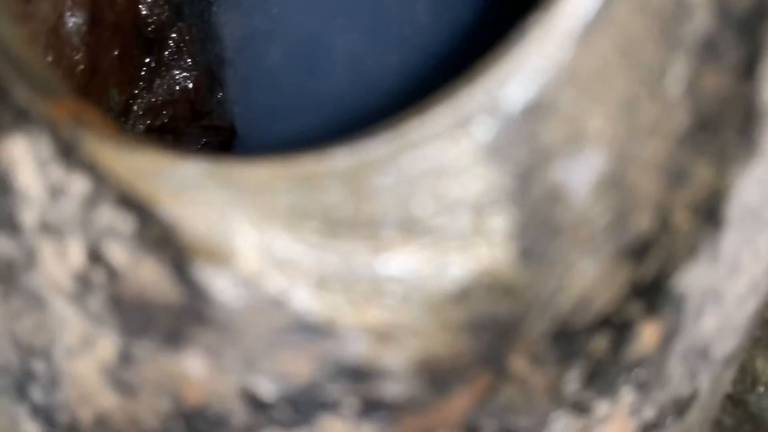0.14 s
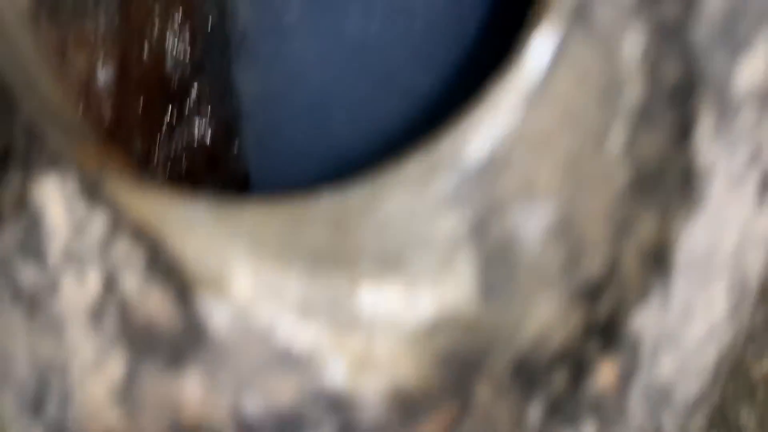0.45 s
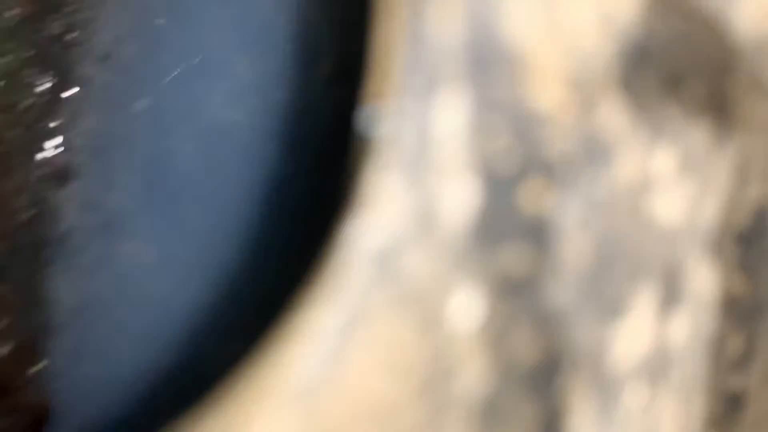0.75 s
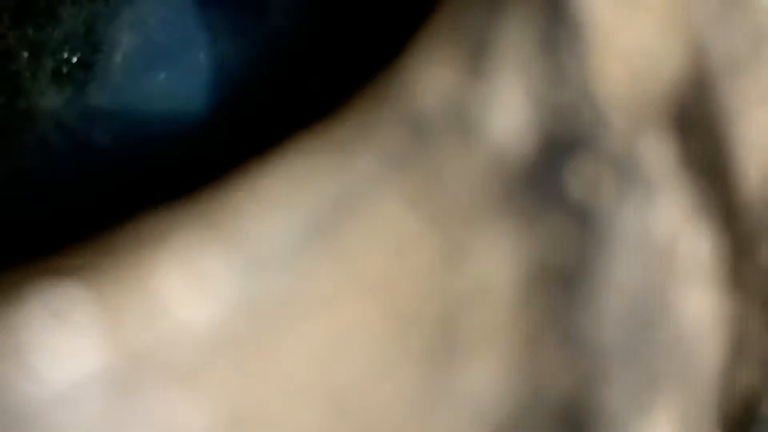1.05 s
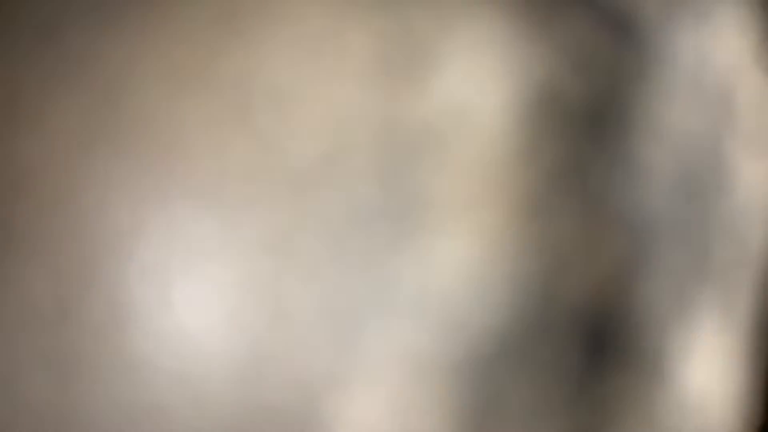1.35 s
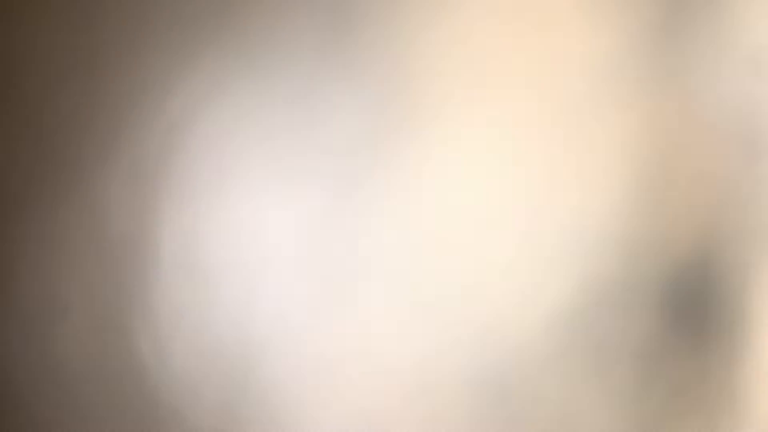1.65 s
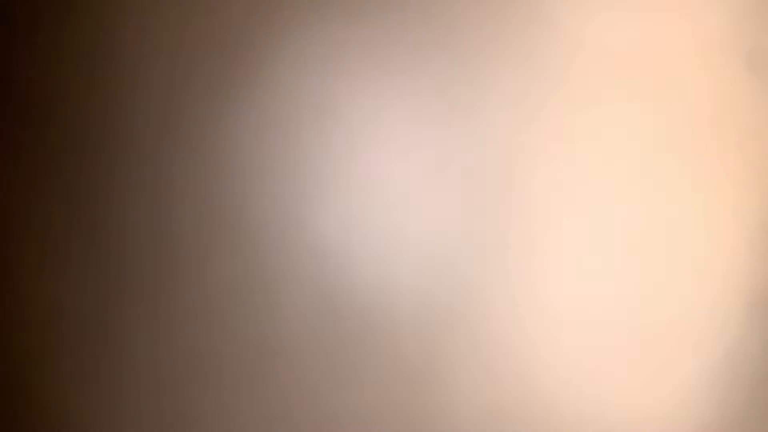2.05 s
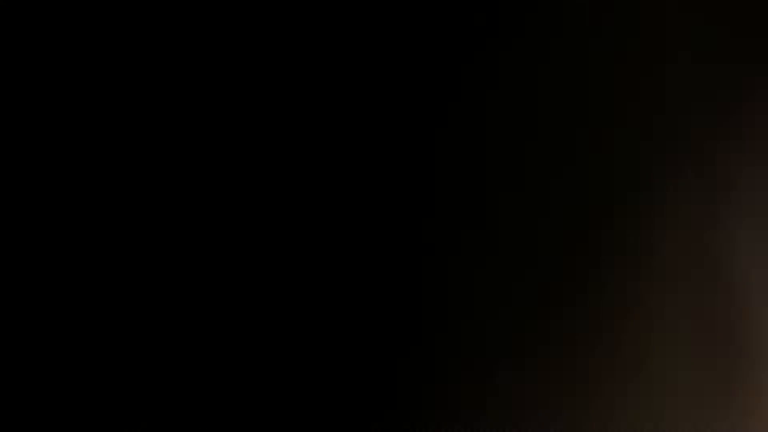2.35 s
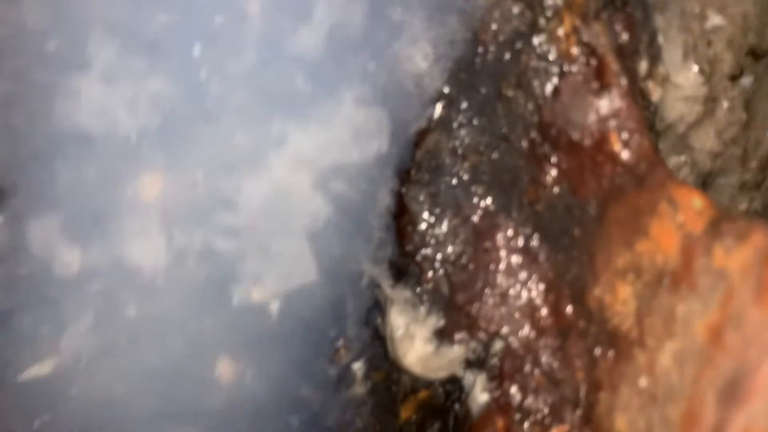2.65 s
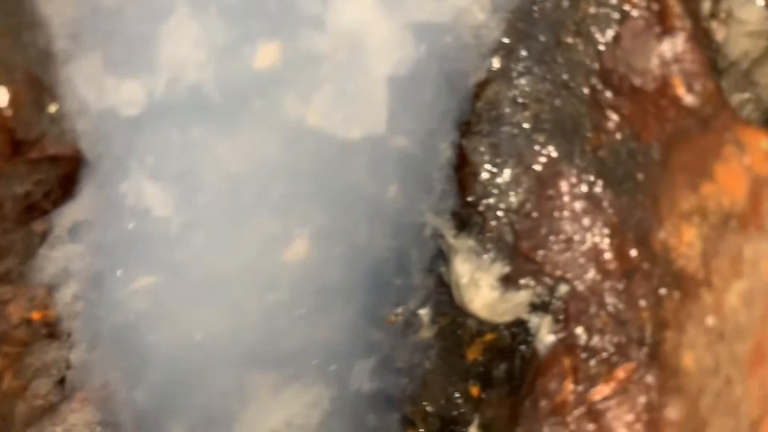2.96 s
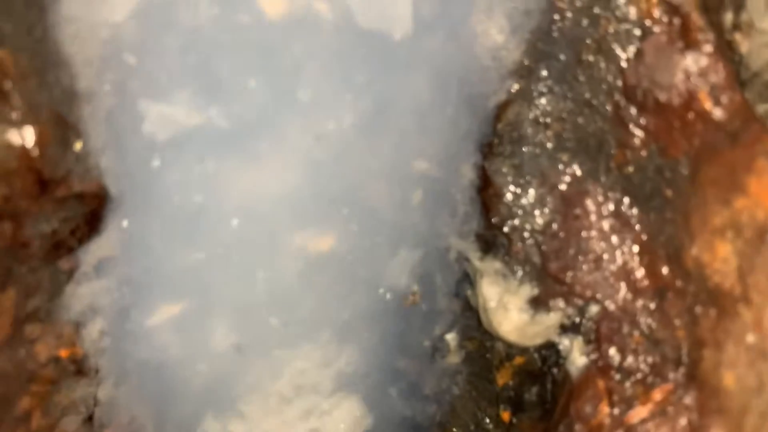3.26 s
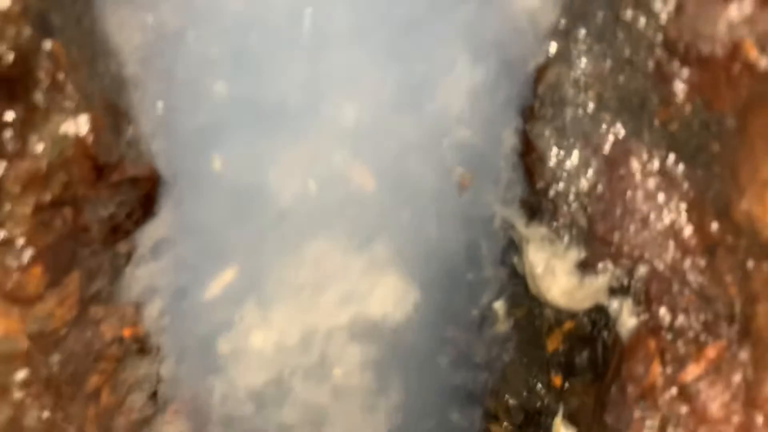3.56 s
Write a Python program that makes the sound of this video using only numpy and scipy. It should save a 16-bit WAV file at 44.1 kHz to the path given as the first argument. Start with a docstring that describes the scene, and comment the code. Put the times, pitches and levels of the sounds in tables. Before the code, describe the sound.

Hollow iron knocks and a short rusty scrape as a camera bumps inside a drain pipe

```python
"""A low rush, filtered noise, runs throughout; from about 0.3 s grainy rubs of a camera housing on a
cast-iron drain pipe join it. A noise-band squeak swells, then falls off as the camera lands on the rim at 0.87 s:
knocks (filtered impulses and rattles) and a damped 50 Hz thud; the contacts lose bass, then regain it.
More knocks and rubs follow, the main ring rising; a stick-slip scrape along rust (random impulses) spans
2.15-2.42 s. Knocks and grind reach the microphones through the case, treble first and bass last."""
import sys
import numpy as np
from scipy import signal
from scipy.fft import rfft, irfft, next_fast_len
from scipy.io import wavfile
from scipy.ndimage import uniform_filter1d, map_coordinates

SR = 44100
rng = np.random.default_rng(int(sys.argv[2]) if len(sys.argv) > 2 else 0)


def int16_out(signal):
    """Quantize to a 16-bit WAV file."""
    q = np.round(np.clip(np.atleast_2d(signal).T, -1, 1) * 32767)
    wavfile.write(sys.argv[1], SR, q.astype(np.int16))


N = 163170

# Knocks of housing on pipe (time [s], thump [dB], knock [dB], clack [dB], tick [dB]), before voice gains
KNOCK_EVENTS = [(0.868, -13, -17.5, 3.5, -17), (0.872, -9, -12, -41.5, -18.5),
                (0.885, -18, -20.5, -43.5, -45.5), (0.963, -17.5, -28.5, -42.5, -48),
                (1.007, -20.5, -27.5, -48, -53.5), (1.066, -16, -24, -37, -42),
                (1.077, -50, -26, -9, -35.5), (1.083, -9, -12.5, -18, -30), (1.245, -24.5, -31, -22.5, -47),
                (1.475, -28.5, -36, -32, -45.5), (1.602, -6, -9, -19, -58.5),
                (1.612, -3.5, -5.5, -28, -42.5), (1.619, -23, -1, -50.5, -51.5),
                (1.638, -10.5, -6, -28, -38.5), (1.728, -28, -26, -24.5, -35.5),
                (1.876, -6.5, -14.5, -26, -52), (1.973, -30.5, -30, -16, -38),
                (2.026, -10, -5.5, -9.5, -35), (2.036, -3.5, -7, -31, -55.5),
                (2.156, -31.5, -20.5, -20, -29), (2.203, -14.5, -25, -19.5, -35.5),
                (2.239, -25.5, -7.5, -22, -28.5), (2.257, -23, -10, -41, -31.5),
                (2.268, -9, -7.5, -31, -32), (2.311, -51, -11, -17, -23.5), (2.355, -22, -4.5, -27, -21),
                (2.365, -25, -11.5, -21.5, -31), (2.395, -58, -15.5, -15.5, -23),
                (2.409, -20.5, -12.5, -17.5, -29.5), (2.502, -12, -1, -12.5, -31.5),
                (2.521, -8.5, -2.5, -19, -32), (2.541, -36, -5, -33, -37.5),
                (2.551, -12.5, -4.5, -42, -40.5), (2.565, -26.5, -12, -40, -50),
                (2.592, -24, -22.5, -39.5, -51.5), (3.115, -16.5, -9.5, -42, -64),
                (3.456, -33, -11, -24.5, -48), (3.469, -22, -4, -34, -40), (3.489, -23, -9, -40.5, -48),
                (3.503, -26.5, -9.5, -21, -55), (3.51, -15, -13.5, -24, -40.5),
                (3.529, -22.5, -10, -31.5, -44), (3.566, -28.5, -18, -33.5, -51)]
# Spectra of the four knock voices (frequency [Hz], level [dB])
THUMP_SPECTRUM = [(25, -25.5), (60, -10.5), (110, -1), (180, 2.5), (250, -3), (400, -18.5), (900, -73.5)]
KNOCK_SPECTRUM = [(100, -37), (250, -21), (390, -4), (650, -4.5), (850, -19), (1300, -29.5), (3000, -86.5)]
CLACK_SPECTRUM = [(500, -22), (900, -0.5), (1350, 8.5), (1800, 1.5), (2600, -5.5), (3400, -15),
                  (9000, -61.5)]
TICK_SPECTRUM = [(2500, -25), (4500, -6), (6600, -6), (8500, 3), (10500, -1), (12000, -15), (13800, 0),
                 (15500, -25.5)]
THUMP_GAIN_DB, KNOCK_GAIN_DB, CLACK_GAIN_DB, TICK_GAIN_DB = 0, -1.5, -7.5, 1
RATTLE_DB, RATTLE_T60_S, TICK_T60_S = -6.5, 0.026, 0.0087  # rattle energy is against the push
# Main ring of the housing, moving with the contact point (time [s], frequency [Hz])
RING_TRACK = [(1.0, 290), (1.6, 363), (2.55, 399.4), (3.115, 426), (3.47, 509)]
RING_DB, RING_Q = 6, 6
THUD_S, THUD_HZ, THUD_DB = 0.885, 50, -17.5

# Hard scrape along the rust (time [s], body [dB], treble [dB]), before grind and grit gains
SCRAPE_LEVELS = [(2.145, -33.5, -57), (2.178, -26, -53.5), (2.192, -17, -38.5), (2.21, -19.5, -45.5),
                 (2.226, -20, -46.5), (2.242, -18.5, -42), (2.272, -16.5, -43), (2.299, -29.5, -46.5),
                 (2.325, -32, -54.5), (2.352, -14.5, -39.5), (2.375, -22, -41.5), (2.39, -24.5, -41.5),
                 (2.412, -26.5, -46.5), (2.424, -38.5, -69)]
GRIND_GAIN_DB, GRIT_GAIN_DB = -1.5, 3
SLIPS_PER_S, GRAINS_PER_S = 520, 5500
GRIND_THUMP_DB, GRIND_CLACK_DB = -3.5, -16.5  # against the knock voice of the grind

# Light rubs (peak time [s], rise [s], fall [s], body [dB], hiss [dB]); rise and fall each span FADE_DB
RUB_EVENTS = [(.45, 0.31, 0.23, -76, -58.5), (0.596, 0.053, 0.05, -46, -47.5),
              (0.835, 0.069, 0.041, -26.5, -34), (0.867, 0.021, 0.014, -12.5, -22),
              (1.015, 0.059, 0.032, -33, -48.5), (1.072, 0.044, 0.019, -32, -46),
              (1.296, 0.17, 0.058, -40.5, -52.5), (1.488, 0.059, 0.044, -42, -54),
              (1.604, 0.062, 0.041, -27.5, -40.5), (1.85, 0.053, 0.057, -30.5, -46.5),
              (1.908, 0.06, 0.08, -29.5, -42), (1.978, 0.013, 0.19, -28, -41.5),
              (2.033, 0.015, 0.037, -25.5, -38.5), (2.106, 0.012, 0.038, -23.5, -40.5),
              (2.534, 0.039, 0.084, -19, -42.5), (2.799, 0.12, 0.18, -42, -54.5),
              (2.967, 0.19, 0.083, -35, -54.5), (3.225, 0.039, 0.23, -44.5, -62),
              (3.498, 0.062, 0.068, -21, -43.5)]
# Rub spectra (frequency [Hz], level [dB])
RUB_BODY_SPECTRUM = [(60, -35.5), (200, -4), (380, -2.5), (620, -1), (850, -13.5), (1300, -27.5),
                     (3000, -65.5)]
RUB_HISS_SPECTRUM = [(700, -15.5), (1300, 4.5), (2600, -4), (4300, -22), (8000, -51.5)]
RUB_GRAINS_PER_S, RUB_FIZZ_DB = 1800, -18  # fizz is against the hiss
FADE_DB = 20  # rubs and squeak
ROUGH_DB = 2  # rubs and scrape
SHIFT_DB = 5.5  # rms colour change of the grind; half that in rubs and grit

SQUEAK_S, SQUEAK_RISE_S, SQUEAK_FALL_S = 0.867, 0.014, 0.0015
SQUEAK_HZ, SQUEAK_WIDTH_HZ = 4800, 700
SQUEAK_DB, SQUEAK_LEFT_MINUS_RIGHT_DB = -23, -15.5

# Low rush (time [s], rumble [dB], airy part [dB])
RUSH_LEVELS = [(0, -39, -47.5), (.87, -37.5, -44.5), (.93, -61, -77.5), (1.15, -50.5, -55),
               (1.58, -43.5, -58), (1.7, -60, -56), (1.85, -42, -44.5), (2.7, -45, -55), (3.7, -47, -55)]
# Rush spectra (frequency [Hz], level [dB])
RUMBLE_SPECTRUM = [(22, -14.5), (55, 1), (85, -1.5), (120, -6), (175, -7.5), (260, -13.5), (500, -41),
                   (1500, -84)]
AIR_SPECTRUM = [(100, -17), (250, 4.5), (620, -0.5), (900, -9.5), (2000, -19.5), (3000, -25.5),
                (6000, -38.5), (15000, -50)]

LAG_CYCLES = 1.4  # case delay is LAG_CYCLES / (f + 20 Hz)
THIN_S, THIN_HZ, THIN_RECOVER_S = 0.93, 218, 1
# Resonances of pipe mouth and housing (frequency [Hz], level [dB])
PIPE_RESONANCES = [(185, -11), (660, -13), (960, -13.5), (1290, -5.5), (1540, -14.5), (2450, -8),
                   (4150, -1.5)]
DIRECT_DB, PIPE_Q = -0.5, 11
# Level difference of the ports (frequency [Hz], left minus right [dB])
PORT_TILT = [(100, 1), (450, -2), (740, 12), (1220, 8), (2000, 6.5), (3300, -0.5), (5500, -4), (9000, 1)]
# Phase difference of the ports (frequency [Hz], lead of the left [rad])
PORT_LEAD = [(120, -0.009), (780, 0.71), (1100, -2), (2100, -1), (3800, -1.85)]
# Likeness of the ports for contacts and for the rush (frequency [Hz], coherence [0-1])
CONTACT_COHERENCE = [(300, .9), (1400, 0.49), (9000, 0.7)]
RUSH_COHERENCE = [(640, 1), (1400, 0.053), (8000, 0.2)]
TOP_HZ = 16200


def amp(db):
    """Decibels to gain."""
    return 10 ** (np.asarray(db) / 20)


def unit(x):
    """x at rms 1."""
    return x / np.sqrt(np.mean(x ** 2) + 1e-20)


def along(points, hz):
    """Interpolate (Hz, value) points on a log-frequency axis."""
    f, v = np.transpose(points)
    return np.interp(np.log(hz + 1), np.log(f + 1), v)


def curves(rows):
    """One value per sample for each column after the time."""
    s, *cols = np.transpose(rows)
    return [np.interp(np.arange(N) / SR, s, c) for c in cols]


def wobble(knots_per_s):
    """A smooth random curve."""
    knots = rng.standard_normal(int(N * knots_per_s / SR) + 4)
    return map_coordinates(knots, [np.arange(N) * knots_per_s / SR])


def peak_fade_db(t, peak_s, rise_s, fall_s):
    """Straight-line dB rise to 0 at the peak, then fall."""
    return -FADE_DB * np.maximum((peak_s - t) / rise_s, (t - peak_s) / fall_s)


def filtered(x, response):
    """x times a complex response of frequency."""
    n = x.shape[-1]
    m = next_fast_len(n + SR // 4)
    return irfft(rfft(x, m) * response(np.fft.rfftfreq(m, 1 / SR)), m)[..., :n]


def noise():
    """Two unrelated white noises."""
    return rng.standard_normal((2, N))


def grains(per_s, spread_db):
    """Two random trains of impulses of either sign and varied level."""
    hits = rng.random((2, N)) < per_s / SR
    return hits * np.sign(noise()) * amp(spread_db * np.clip(noise(), -2, 2))


def resonance(hz, centre_hz, q):
    """One damped mode, gain 1 at its centre."""
    return 1 / (1 + 1j * q * (hz / centre_hz - centre_hz / (hz + 1e-9)))


def case(hz):
    """Dispersion in the case delays the bass, so each blow drops in pitch."""
    return np.exp(-2j * np.pi * LAG_CYCLES * np.log(hz + 20))


def ports(hz, share=1):
    """Level and phase at the left and right ports, mean power 1; share scales the differences."""
    sides = np.array([[1], [-1]])
    gain = amp(sides * share * along(PORT_TILT, hz) / 2)
    gain = gain / np.sqrt(np.mean(gain ** 2, axis=0))
    return gain * np.exp(0.5j * sides * share * along(PORT_LEAD, hz))


def stereo(pair, spectrum, coherence, share=0):
    """Colour two unrelated signals and mix them to left and right with a given coherence, rms 1."""
    def mid_side(hz):
        turn = np.arccos(np.clip(along(coherence, hz), -1, 1)) / 2
        return amp(along(spectrum, hz)) * [np.cos(turn), np.sin(turn)]

    mid, side = filtered(pair, mid_side)
    return unit(filtered(np.array([mid + side, mid - side]), lambda hz: ports(hz, share)))


def shifting(x, depth_db):
    """The contact point wanders over the surface: random time-frequency gains, rms 1 out."""
    z = signal.stft(x, nperseg=512)[2]
    field = rng.standard_normal(z.shape[1:])
    field = uniform_filter1d(field, size=3, axis=0)  # across frequency
    field = uniform_filter1d(field, size=5, axis=1)  # across time
    return unit(signal.istft(z * amp(depth_db * unit(field)), nperseg=512)[1][:, :N])


def knocks():
    """Impulse plus decaying rattle excites three voices through the case; a noise tick bypasses it."""
    lead, size = SR // 50, SR // 6
    t = (np.arange(size) - lead) / SR
    out = np.zeros((2, N + SR))

    def decay(t60_s):
        return (t >= 0) * amp(-60 * np.abs(t) / t60_s)

    def peak_one(v):
        power = np.mean(np.abs(signal.hilbert(v)) ** 2, axis=0)
        return v / np.sqrt(power).max()

    for s, thump_db, knock_db, clack_db, tick_db in KNOCK_EVENTS:
        rattle = rng.standard_normal(size) * decay(RATTLE_T60_S)
        push = (t == 0) + amp(RATTLE_DB) * rattle / np.linalg.norm(rattle)
        phase = np.exp(2j * np.pi * rng.random())
        ring_hz = np.interp(s, *np.transpose(RING_TRACK))
        ringing = push + amp(RING_DB) * filtered(push, lambda hz: resonance(hz, ring_hz, RING_Q))
        voices = [(push, THUMP_SPECTRUM, thump_db + THUMP_GAIN_DB),
                  (ringing, KNOCK_SPECTRUM, knock_db + KNOCK_GAIN_DB),
                  (push, CLACK_SPECTRUM, clack_db + CLACK_GAIN_DB)]
        blow = np.zeros((2, size))
        for drive, shape, db in voices:
            voice = filtered(drive, lambda hz: phase * amp(along(shape, hz)) * case(hz) * ports(hz))
            blow += amp(db) * peak_one(voice)
        tick = rng.standard_normal(size) * decay(TICK_T60_S)
        tick = filtered(tick, lambda hz: amp(along(TICK_SPECTRUM, hz)) * ports(hz))
        blow += amp(tick_db + TICK_GAIN_DB) * peak_one(tick)
        start = round(s * SR) - lead
        out[:, start:start + size] += blow
    return out[:, :N]


def thud():
    """Deep push of the landing: a heavily damped sine, almost ringless."""
    cycles = np.maximum(np.arange(N) / SR - THUD_S, 0) * THUD_HZ
    return amp(THUD_DB) * np.sin(2 * np.pi * cycles) * np.exp(-2 * cycles)


def scrape():
    """Stick-slip on rust: random slips drive three knock voices through the case, over crackling grit."""
    body_db, treble_db = curves(SCRAPE_LEVELS)
    t = np.arange(N) / SR
    in_contact = (t > SCRAPE_LEVELS[0][0]) & (t < SCRAPE_LEVELS[-1][0])
    touching = uniform_filter1d(1. * in_contact, size=300)
    slips = filtered(grains(SLIPS_PER_S, spread_db=0.5), case)
    grind = np.zeros((2, N))
    for shape, db in [(THUMP_SPECTRUM, GRIND_THUMP_DB), (KNOCK_SPECTRUM, 0), (CLACK_SPECTRUM, GRIND_CLACK_DB)]:
        grind += amp(db) * shifting(stereo(slips, shape, CONTACT_COHERENCE, 0.95), SHIFT_DB)
    crackle = grains(GRAINS_PER_S, spread_db=4.5) * amp(4.5 * wobble(170))
    grit = shifting(stereo(crackle, TICK_SPECTRUM, CONTACT_COHERENCE, 1), SHIFT_DB / 2)
    sticking = unit(amp(ROUGH_DB * wobble(90)))
    body = amp(body_db + GRIND_GAIN_DB) * sticking * grind
    return touching * (body + amp(treble_db + GRIT_GAIN_DB) * grit)


def rubs():
    """Housing brushing iron: random grains coloured as body, hiss and faint fizz, in swells."""
    t, power = np.arange(N) / SR, np.zeros((2, N))
    for s, rise_s, fall_s, *levels_db in RUB_EVENTS:
        power += amp(np.array(levels_db)[:, None] + peak_fade_db(t, s, rise_s, fall_s)) ** 2
    layers = []
    for shape in (RUB_BODY_SPECTRUM, RUB_HISS_SPECTRUM, TICK_SPECTRUM):
        brushed = stereo(grains(RUB_GRAINS_PER_S, spread_db=0.5), shape, CONTACT_COHERENCE, 0.94)
        layers.append(shifting(brushed, SHIFT_DB / 2))
    body, hiss, fizz = layers
    rough = unit(amp(ROUGH_DB * wobble(130)))
    body_gain, hiss_gain = np.sqrt(power)
    return rough * (body_gain * body + hiss_gain * (hiss + amp(RUB_FIZZ_DB) * fizz))


def squeak():
    """Shrill squeak, stronger at the right port: a fixed noise band with slow rise and abrupt fall."""
    t = np.arange(N) / SR
    band = filtered(rng.standard_normal(N), lambda hz: 1 / (1 + ((hz - SQUEAK_HZ) / SQUEAK_WIDTH_HZ) ** 2))
    fade_db = peak_fade_db(t, SQUEAK_S, SQUEAK_RISE_S, SQUEAK_FALL_S)
    pan_db = SQUEAK_LEFT_MINUS_RIGHT_DB * np.array([[1], [-1]]) / 2
    return unit(band) * amp(SQUEAK_DB + fade_db + pan_db)


def rush():
    """Rumble and airy noise; both drop after the first big knock and return; the rumble dips again near 1.7 s."""
    rumble_db, air_db = curves(RUSH_LEVELS)
    rumble = amp(rumble_db) * stereo(noise(), RUMBLE_SPECTRUM, RUSH_COHERENCE)
    return rumble + amp(air_db) * stereo(noise(), AIR_SPECTRUM, RUSH_COHERENCE)


def thinned(x):
    """Remove the bass at THIN_S and let it return slowly."""
    t = np.arange(N) / SR - THIN_S
    bass = filtered(x, lambda hz: np.exp(-(hz / THIN_HZ) ** 2))
    return x - bass * (t > 0) * np.exp(-(t / THIN_RECOVER_S) ** 2)


def pipe(x):
    """Pipe mouth and housing: parallel damped modes add a hollow colour to the direct sound."""
    def response(f):
        return amp(DIRECT_DB) + sum(amp(db) * resonance(f, hz, PIPE_Q) for hz, db in PIPE_RESONANCES)

    return filtered(x, response)


def scene():
    """Knocks, rubs and scrape ring in the pipe mouth; squeak, thud and rush bypass it."""
    contacts = knocks() + rubs() + scrape()
    return pipe(thinned(contacts)) + squeak() + thud() + rush()


def record(dry):
    """Round off peaks near 0.9, then cut everything from TOP_HZ up."""
    held = dry / (1 + np.abs(dry / 0.9) ** 6) ** (1 / 6)
    return filtered(held, lambda hz: hz < TOP_HZ)


dry = scene()
out = record(dry)
int16_out(out)
```